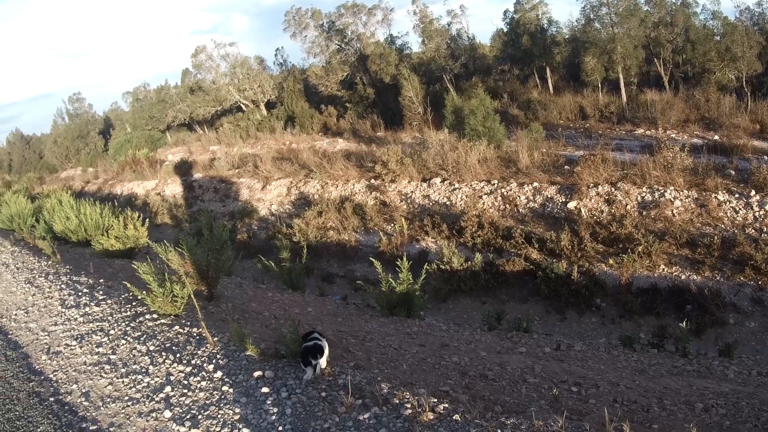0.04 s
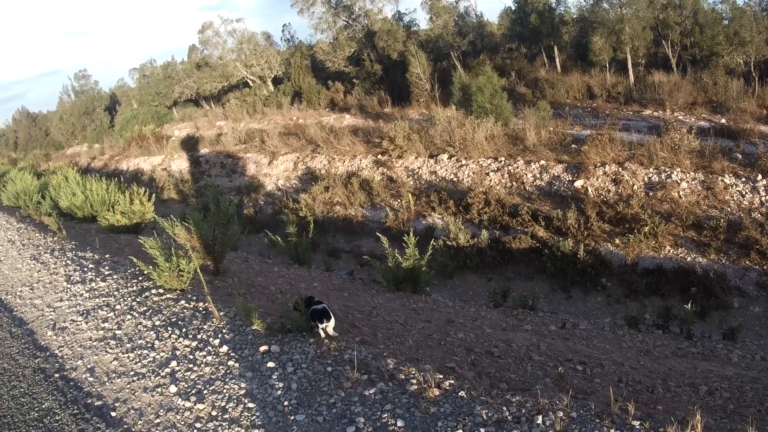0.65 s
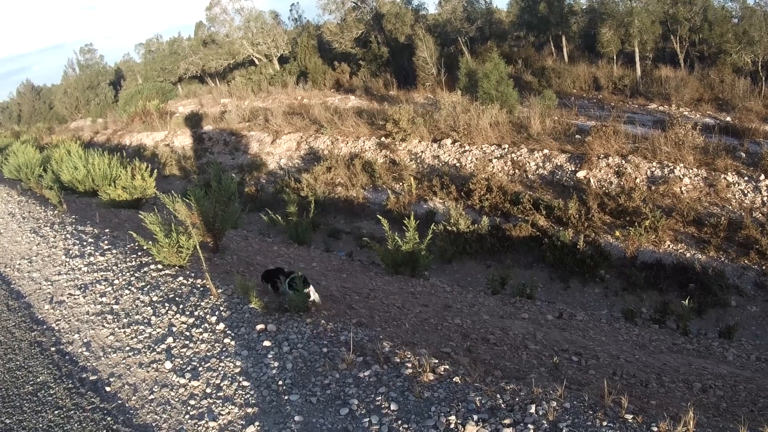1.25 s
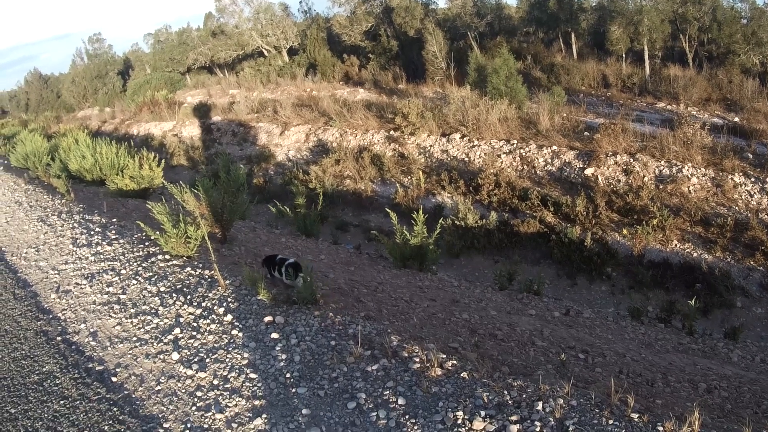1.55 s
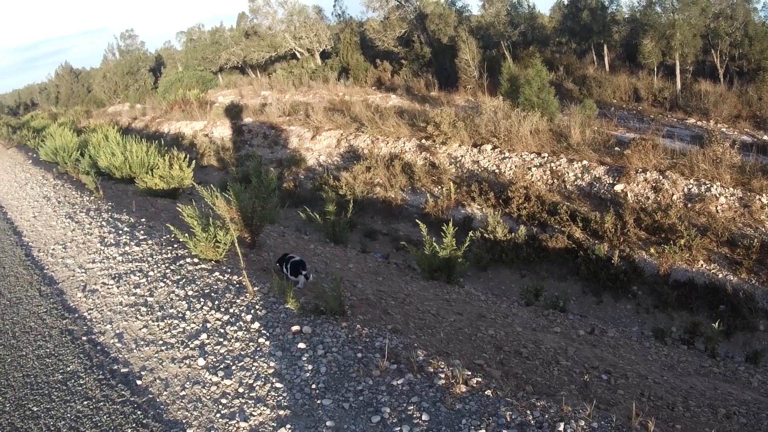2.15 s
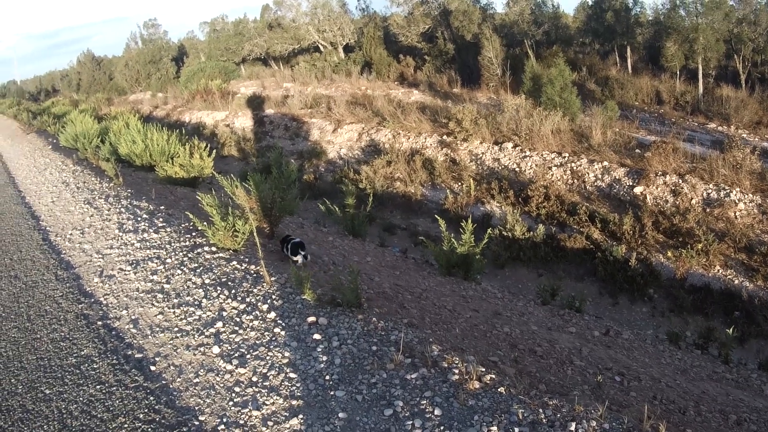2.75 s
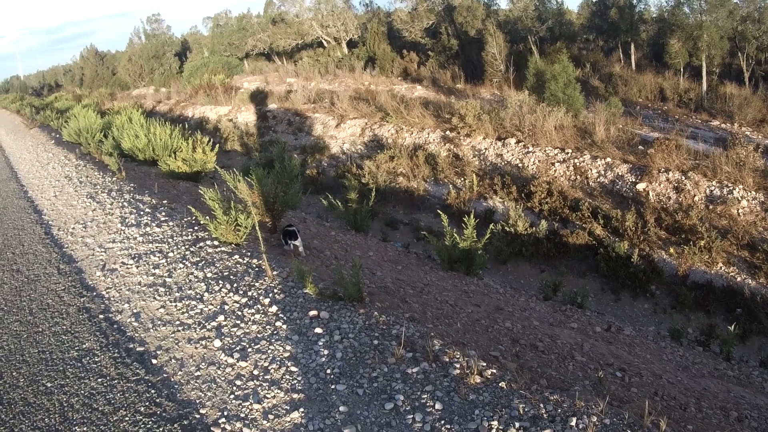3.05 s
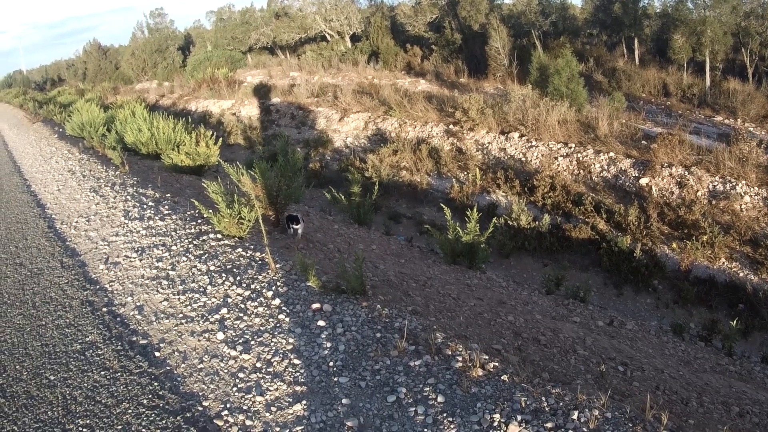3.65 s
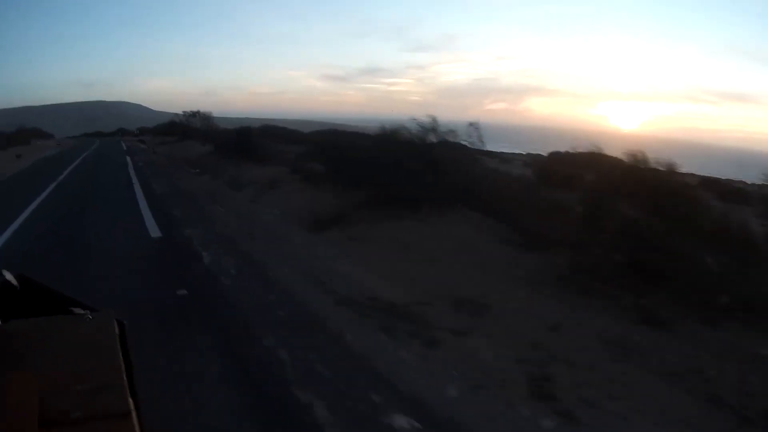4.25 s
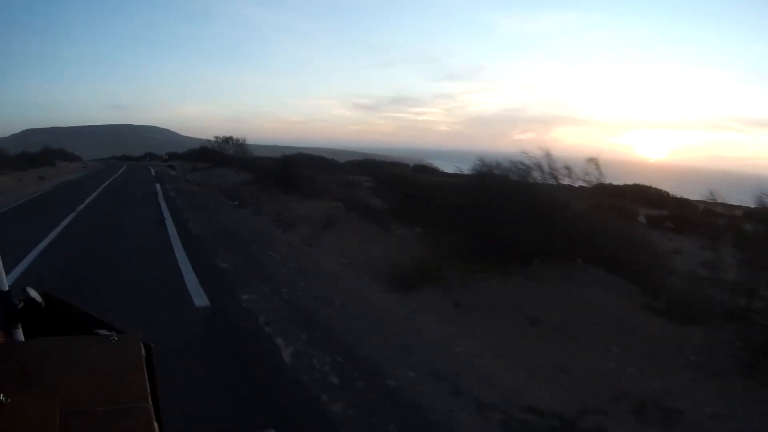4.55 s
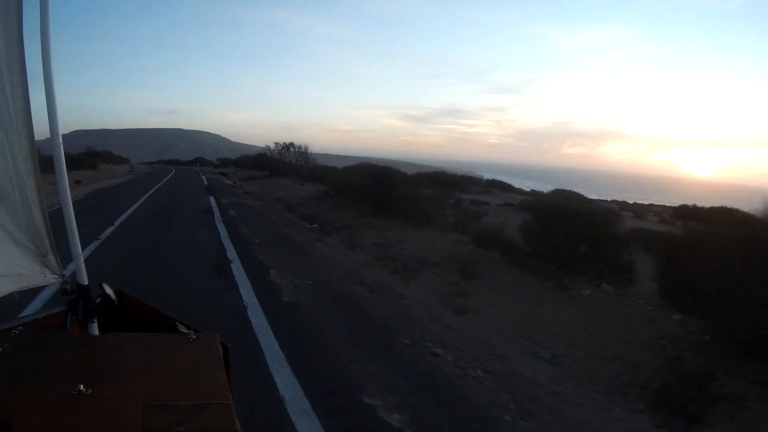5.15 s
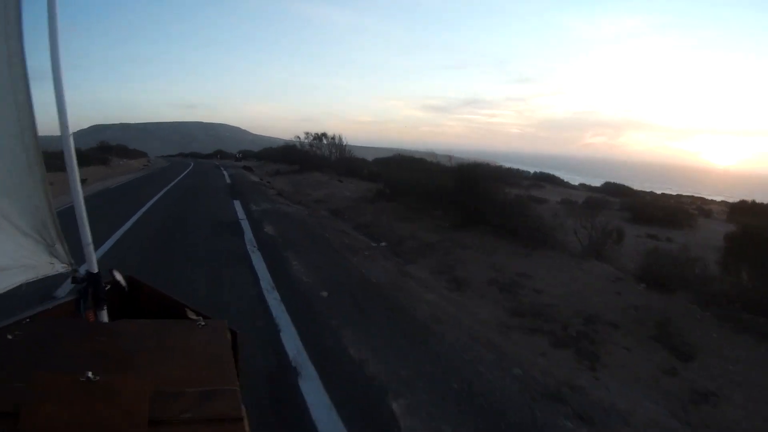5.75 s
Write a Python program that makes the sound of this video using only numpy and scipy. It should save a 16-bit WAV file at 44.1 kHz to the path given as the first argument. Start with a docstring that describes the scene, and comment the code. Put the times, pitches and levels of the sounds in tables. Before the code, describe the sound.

A steady outdoor hiss with a soft low rumble opens, sounding hollow because the microphone sits in a closed plastic case. A far bird gives two very faint, thin chirps at the very start, and a sharp tap rings the case at about 0.2 seconds. A dull knock comes at 1.5 seconds, a small click at 1.7, and a short double scuff near 1.8. The hiss swells slightly around 2.4 seconds, then settles with a faint hollow whistling tone.

At about 3.7 seconds it fades quickly into a louder ride on a sail cart. Wheels rumble and grind over gritty asphalt while loose parts tick and clack irregularly. The wooden deck booms softly over bumps near 3.8, 4.2 and 5.9 seconds. Deep wind builds by 4.2 seconds and buffets the microphone in short thumps until the end, at about 6 seconds.

```python
"""Roadside air, then a sail cart

The microphone sits in a closed plastic case, which makes the roadside hiss sound hollow. A far bird
chirps, and the case gets a few taps and a short scuff. Then comes a quick fade to a sail cart on asphalt:
the wheels rumble and grind over grit, the deck booms and rattles, and wind buffets the microphone."""
import sys
import numpy as np
from scipy import signal
from scipy.fft import rfft, irfft, next_fast_len
from scipy.io import wavfile
from scipy.ndimage import uniform_filter1d, minimum_filter1d, map_coordinates

SR = 44100
rng = np.random.default_rng(int(sys.argv[2]) if len(sys.argv) > 2 else 0)


def log_audio(samples):
    """Write samples as a 16-bit WAV file to the path given in sys.argv[1]."""
    # one column per channel
    frames = np.atleast_2d(samples).T
    # limit to full scale, then quantise
    limited = np.clip(frames, -1, 1)
    pcm = np.round(limited * 32767).astype(np.int16)
    wavfile.write(sys.argv[1], SR, pcm)


N = 264688
TIME = np.arange(N) / SR
FADE_START_S, FADE_END_S = 3.664, 3.83  # from the roadside to the ride

# How hard the road shakes the cart: (time [s], level [dB])
ROAD_SHAKE = [(3.78, -30.5), (3.97, -32.5), (4.02, -29), (4.07, -34.5), (4.17, -27.8), (4.28, -26.5),
              (4.42, -26.5), (4.56, -27), (4.85, -29.5), (5.02, -29), (5.25, -33), (5.42, -29), (5.51, -32),
              (5.75, -26), (5.88, -31), (5.94, -26.5)]
# The tone of each layer of road noise, deepest first: (frequency [Hz], level [dB])
DECK_TONE = [(50, -10.5), (105, 1.5), (175, 4.5), (215, 1), (270, -6), (380, -14), (700, -62), (2000, -120)]
TYRE_TONE = [(150, -25.5), (330, -1.5), (520, -1), (650, -1.5), (790, -1.5), (950, -7), (1150, -14.5),
             (1400, -24.5), (2000, -37), (5000, -120)]
GRIT_TONE = [(200, -66), (700, -21), (1400, 0.5), (2150, -0.5), (2400, -8.5), (2650, -18.5), (3250, -20),
             (3600, -15), (3900, -14), (4550, -15.5), (5150, -30), (6400, -29), (8000, -36.5), (15000, -68)]
SIZZLE_TONE = [(2500, -30), (5000, -5.5), (5500, -2.5), (5900, -2.5), (6500, -3), (7200, -11.5), (7850, -7),
               (8500, -16.5), (9700, -13), (11000, -20.5), (13000, -17.5), (15000, -23.5)]
# High notes of the case during the ride: (pitch [Hz], width [Hz], level at average shaking [dB])
SHRILL_NOTES = [(3980, 360, -66), (6480, 480, -78)]

def wheels():
    """The rough road shakes the deck, makes the tyres roar and crunches as grit."""
    ride_db = np.interp(TIME, *np.transpose(ROAD_SHAKE))
    shake_db = ride_db - ride_db[round(FADE_END_S * SR):].mean()  # 0 at average shaking
    bumps = wobble(70)
    deck = amp(-28.5 + shake_db + 0.17 * bumps) * rush(DECK_TONE, patchy_db=1.5)
    roar = amp(-31 + 0.82 * shake_db + 0.57 * bumps) * rush(TYRE_TONE, patchy_db=0.17)
    crunch = unit(coloured(grains(per_second=6700, spread_db=-2), GRIT_TONE))
    grit = amp(-49.5 + 0.59 * shake_db + 1.1 * bumps) * crunch
    # The tiniest hits are so many that they blur into a steadier sizzle.
    sizzle = amp(-70 + 0.35 * shake_db) * rush(SIZZLE_TONE, patchy_db=0.6)
    case_ring = sum(amp(db) * hollow(hz, width_hz) for hz, width_hz, db in SHRILL_NOTES)
    shrill = amp(0.1 * shake_db + 1.5 * bumps) * case_ring
    return deck + roar + grit + sizzle + shrill


# The deep rumble of wind on the microphone: (frequency [Hz], level [dB])
WIND_TONE = [(8, -10.5), (22, -0.5), (45, 5.5), (80, 2), (120, -7.5), (220, -33.5), (600, -77),
             (2000, -120)]
# Single swirls of air: (time [s], peak level [dB], pitch [Hz], half length [s])
SWIRLS = [(4.113, -10, 36.3, 0.014), (4.414, -11.5, 62, 0.01), (4.465, -25, 86, 0.022),
          (4.748, -18, 138, 0.011), (4.861, -16, 52.3, 0.021), (5.017, -13.5, 36, 0.013),
          (5.079, -16, 105, 0.0088), (5.195, -16.5, 65, 0.011), (5.32, -13.5, 64.6, 0.018),
          (5.569, -17, 40, 0.015), (5.863, -14.5, 55.4, 0.0086), (5.914, -13.5, 41.5, 0.012)]

def wind(full_from_s=4.19, rise_db_per_s=22.5):
    """Lumpy wind builds and holds, while short swirls push and pull on the microphone."""
    level_db = -27.5 - rise_db_per_s * np.maximum(0, full_from_s - TIME)
    rumble = amp(level_db + 1.6 * wobble(23)) * rush(WIND_TONE, patchy_db=0)
    return rumble + sum(throb(s, db, hz, half_s) for s, db, hz, half_s in SWIRLS)


# Bumps in the road: (time [s], peak level [dB], pitch [Hz])
ROAD_BUMPS = [(3.793, -22, 184), (4.204, -22.5, 162), (5.92, -22.5, 157)]

def jolts():
    """Each bump makes the wooden deck boom."""
    return sum(throb(s, db, hz, half_s=0.013) for s, db, hz in ROAD_BUMPS)


# Light rattles: (time [s], tick level [dB], clack level [dB], time to die away [s])
RATTLE_HITS = [(3.843, -55, -52, 0.023), (3.8875, -64, -32.5, .03), (3.941, -54.5, -41, .06),
               (3.9936, -54, -34, 0.031), (4.0125, -53.5, -46, 0.023), (4.0265, -55.5, -35, 0.036),
               (4.1168, -52, -47, 0.051), (4.205, -64, -33, 0.025), (4.224, -60, -36, 0.025),
               (4.372, -53, -47, .03), (4.549, -60, -37, 0.028), (4.684, -53.5, -49, .035),
               (4.757, -55.5, -46, .04), (4.988, -55.5, -41, 0.049), (5.642, -52.5, -43, 0.042),
               (5.735, -56, -29, 0.026), (5.755, -58, -35, 0.023), (5.775, -56, -44, .04),
               (5.908, -47.5, -47, .054)]
# A loose part's bright tick and its duller clack on the deck: (frequency [Hz], level [dB])
TICK_TONE = [(1500, -36), (4000, 8.5), (6300, 12.5), (9000, -6.5), (14000, -10)]
CLACK_TONE = [(500, -17), (1200, 15.5), (2000, 18), (2550, -6.5), (3000, 1.5), (4200, -14), (6000, -29),
              (12000, -46)]

def rattles(attack_s=0.0008):
    """Loose parts tick and clack softly as the cart shakes."""
    t = np.arange(SR // 16) / SR
    ticks, clacks = np.zeros((2, N))
    for s, tick_db, clack_db, decay_s in RATTLE_HITS:
        loudness = amp(-6.5 - 60 * t / decay_s) * (1 - np.exp(-t / attack_s))
        tick, clack = loudness * rng.standard_normal((2, len(t)))
        ticks[round(s * SR):][:len(t)] += amp(tick_db) * tick
        clacks[round(s * SR):][:len(t)] += amp(clack_db) * clack
    return shaped(ticks, TICK_TONE) + shaped(clacks, CLACK_TONE)


# Outdoor air through the case, from low rumble to fine treble: (frequency [Hz], level [dB])
AIR_RUMBLE = [(15, -7), (45, 2.5), (85, 1.5), (135, -4), (250, -5.5), (330, -8), (400, -18.5), (700, -42.5),
              (1500, -120)]
EARLY_HISS = [(60, -50), (400, -15.5), (500, -5), (680, -1.5), (820, 0.5), (1020, -1), (1150, -14.5),
              (1300, -7), (1490, -8), (1660, -22.5), (1880, -27.5), (2080, -23.5), (2550, -37.5),
              (6000, -120)]
LATE_HISS = [(60, -59.5), (400, -13.5), (500, -4.5), (700, -1.5), (930, 1.5), (1075, -13), (1200, -7),
             (1450, -6), (1560, -11.5), (1640, -27.5), (2050, -26.5), (2450, -42), (6000, -120)]
AIR_TREBLE = [(1200, -36.5), (2400, 2), (3600, -1), (5000, -8), (7000, -14), (10000, -21), (12500, -26),
              (15000, -36.5)]

def roadside_air(settle_from_s=2.27, fall_db_per_s=2):
    """The air swells once and settles, and the hollow case sings along at its own notes."""
    swell = bell(peak_s=2.35, half_s=0.72)
    settle_db = fall_db_per_s * np.maximum(0, TIME - settle_from_s)
    rumble = amp(-37.5 - settle_db + 0.35 * wobble(3.2)) * rush(AIR_RUMBLE, patchy_db=1)
    early = rush(EARLY_HISS, patchy_db=0.4)
    late = rush(LATE_HISS, patchy_db=0.5)
    air = crossfade(early, late, ramp(0.82, 1.9))  # the hollow tone shifts down
    hiss = amp(-34.5 + 1.24 * swell + 0.36 * wobble(23.04)) * air
    swell_note = amp(-45) * swell * hollow(1205, width_hz=180)
    whistle_db = -63 + 24.5 * ramp(2.55, 2.67)  # from faint to clear
    whistle = hollow(904, width_hz=122) + amp(-24.5) * hollow(2095, width_hz=360)
    treble = amp(-64 - settle_db) * rush(AIR_TREBLE, patchy_db=1)
    return rumble + hiss + swell_note + amp(whistle_db) * whistle + treble


# Taps on the case: (time [s], ring level [dB], thud level [dB], ring rise time [s], snap level [dB])
CASE_TAPS = [(0.152, -14, -51, 0.001, -33.5), (.218, -31, -60, .009, -70), (1.5214, -39, -12, 0.0016, -36),
             (1.6932, -44, -51, 0.0008, -40.5)]
# The notes a tap sets ringing: (pitch [Hz], level [dB], time to die away [s])
CASE_NOTES = [(1167, -3, 0.012), (1450, 8.5, 0.0061), (1700, -14, 0.025), (1970, -13.5, 0.059),
              (2510, -11, 0.012), (3350, -25, 0.023), (4500, -19.5, 0.013), (5600, -20, 0.0061),
              (6400, -23.5, 0.0068), (8150, -30, .005), (12500, -32, 0.0043)]
# A fingertip's dull push and the snap as it lands: (frequency [Hz], level [dB])
THUD_TONE = [(100, 1), (330, -4), (520, 12), (660, 1), (900, 6.5), (1350, 5), (1800, -13), (2300, -11),
             (2800, -26), (4200, -42), (6000, -66), (12000, -99)]
SNAP_TONE = [(700, -10), (2000, 5), (3300, 3), (4900, -6), (5800, -20), (9000, -34), (14000, -44)]

def taps(snap_decay_s=0.014):
    """A hard touch snaps and rings the case; a soft one mostly pushes it."""
    t = np.arange(SR // 8) / SR
    rings, pushes, snaps = np.zeros((3, N))
    for s, ring_db, thud_db, rise_s, snap_db in CASE_TAPS:
        start = round(s * SR)
        ring = sum(amp(db + rng.normal(0, 1) - 60 * t / decay_s) * np.sin(2 * np.pi * hz * t)
                   for hz, db, decay_s in CASE_NOTES)
        rings[start:][:len(t)] += amp(ring_db) * ring * (1 - np.exp(-t / rise_s))
        pushes[start] = amp(thud_db)
        snaps[start:][:len(t)] += amp(snap_db - 60 * t / snap_decay_s) * rng.standard_normal(len(t))
    return rings + coloured(pushes, THUD_TONE) + shaped(snaps, SNAP_TONE)


# The rasp of rubbing on plastic: (frequency [Hz], level [dB])
RASP_TONE = [(900, -21), (1700, 7.5), (2300, 4), (2900, -2.5), (3900, 0.5), (4700, -2.5), (5500, -6),
             (6200, -31), (12000, -60)]
# Strokes on the case:
# (time [s], half length [s], rasp level [dB], ring level [dB], ring delay [s], ring half length [s])
SCUFF_STROKES = [(1.81, 0.022, -47.5, -26, 0.021, 0.026), (1.868, 0.022, -49, -32.5, 0.0045, 0.013)]

def scuff():
    """Something brushes the case faintly, then rasps twice, with a hollow ring just behind each stroke."""
    rasp = unit(coloured(grains(per_second=5200, spread_db=-3.5), RASP_TONE))
    ring = hollow(906, width_hz=230)
    ring = unit(ring / np.sqrt(1 + np.abs(signal.hilbert(ring)) ** 2))  # steady rubbing evens it out
    ring = filtered(ring, lambda hz: 1 / (1 + (hz / 2000) ** 4))
    sound = amp(-62.5) * bell(peak_s=0.37, half_s=0.08) * rasp  # the faint brush
    for s, half_s, rasp_db, ring_db, delay_s, ring_half_s in SCUFF_STROKES:
        sound += amp(rasp_db) * bell(s, half_s) * rasp
        sound += amp(ring_db) * bell(s + delay_s, ring_half_s) * ring
    return sound


# A far bird's chirps: (time [s], length [s], top pitch [Hz], level [dB])
BIRD_CHIRPS = [(0.018, 0.038, 3420, -66), (.093, 0.057, 3520, -61.5)]

def bird():
    """A bird gives thin whistles that arch up and down in pitch."""
    song = np.zeros(N)
    for s, length_s, top_hz, db in BIRD_CHIRPS:
        position = np.clip(2 * (TIME - s) / length_s, -1, 1)  # -1 at the start, 1 at the end
        pitch = top_hz * (1 - 0.095 * position ** 2)
        song += amp(db) * (1 - position ** 2) * np.sin(2 * np.pi * np.cumsum(pitch) / SR)
    return song


def amp(db):
    """Turn decibels into a number to multiply by."""
    return 10 ** (np.asarray(db) / 20)


def unit(x):
    """Scale a sound to an average power of 1."""
    return x / np.sqrt(np.mean(x ** 2) + 1e-20)


def bell(peak_s, half_s):
    """A smooth rise to 1 and back."""
    return np.exp(-((TIME - peak_s) / half_s) ** 2)


def ramp(start_s, end_s):
    """A straight rise from 0 to 1."""
    return np.clip((TIME - start_s) / (end_s - start_s), 0, 1)


def wobble(per_second):
    """A smooth curve through so many random values a second."""
    return map_coordinates(rng.standard_normal(int(N * per_second / SR) + 4), [TIME * per_second])


def crossfade(a, b, share):
    """Blend from a to b with no dip in power as share goes from 0 to 1."""
    return np.cos(share * np.pi / 2) * a + np.sin(share * np.pi / 2) * b


def throb(s, db, hz, half_s):
    """A very short, low note that swells and dies around time s."""
    return amp(db) * bell(s, half_s) * np.sin(2 * np.pi * ((TIME - s) * hz + rng.random()))


def tone_gain(tone, hz):
    """How strong a tone table makes each frequency."""
    points_hz, points_db = np.transpose(tone)
    return amp(np.interp(np.log(hz + 1), np.log(points_hz + 1), points_db))


def filtered(x, response):
    """Turn each frequency up or down by response(hz)."""
    size = next_fast_len(N + SR // 2)
    return irfft(rfft(x, size) * response(np.fft.rfftfreq(size, 1 / SR)), size)[:N]


def shaped(x, tone):
    """Give a sound the tone in a table."""
    return filtered(x, lambda hz: tone_gain(tone, hz))


def coloured(x, tone, size=8192):
    """Give clicks a tone that rings only after each click, never before."""
    cepstrum = irfft(np.log(tone_gain(tone, np.fft.rfftfreq(size, 1 / SR))))
    cepstrum[1:size // 2] *= 2  # these two lines move the early ringing to after the click
    cepstrum[size // 2 + 1:] = 0
    ring = irfft(np.exp(rfft(cepstrum)))
    return signal.fftconvolve(x, ring / np.abs(ring).max())[:N]


def rush(tone, patchy_db):
    """Rushing noise with random louder and softer patches."""
    grid = signal.stft(rng.standard_normal(N), nperseg=512)[2]  # frequency by time
    patches = uniform_filter1d(rng.standard_normal(grid.shape), size=5, axis=0)
    patches = uniform_filter1d(patches, size=14, axis=1)
    noise = signal.istft(grid * amp(patchy_db * unit(patches)), nperseg=512)[1][:N]
    return unit(shaped(noise, tone))


def hollow(centre_hz, width_hz):
    """Noise ringing at one note of the air inside the case."""
    peak = lambda hz: 1j * hz * width_hz / (centre_hz ** 2 - hz ** 2 + 1j * hz * width_hz)
    return unit(filtered(rng.standard_normal(N), lambda hz: peak(hz) ** 2))


def grains(per_second, spread_db):
    """Tiny hits at random times and of random size."""
    hits = rng.random(N) < per_second / SR
    return hits * rng.standard_normal(N) * amp(spread_db * np.clip(rng.standard_normal(N), -2, 2))


def scene():
    """The roadside fades into the ride."""
    standing = roadside_air() + bird() + taps() + scuff()
    rolling = wheels() + rattles() + wind() + jolts()
    return crossfade(standing, rolling, ramp(FADE_START_S, FADE_END_S) ** 1.27)[None]


def volume_control(x, threshold_db=-23.5, hold_s=0.044, ease_s=0.0025):
    """A sharp treble peak turns the volume down for a moment."""
    treble = np.abs(signal.sosfilt(signal.butter(2, 1500, "high", fs=SR, output="sos"), x))
    needed_gain = np.minimum(1, amp(threshold_db) / (treble + 1e-9))
    half_hold = int(hold_s * SR / 2)
    held_gain = minimum_filter1d(needed_gain, 2 * half_hold + 1, origin=half_hold)
    carry = np.exp(-1 / (ease_s * SR))
    ease = lambda curve: signal.lfilter([1 - carry], [1, -carry], curve)
    return x * (1 - ease(ease(1 - held_gain)))


def record(dry):
    """The sound dips after sharp peaks and loses its very highest treble."""
    return filtered(volume_control(dry[0]), lambda hz: hz < 15000)[None]


dry = scene()
out = record(dry)
log_audio(out)
```